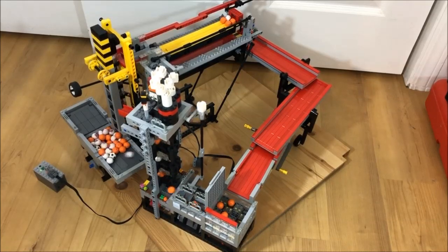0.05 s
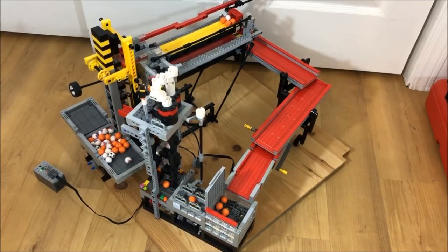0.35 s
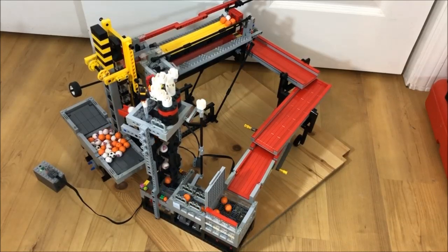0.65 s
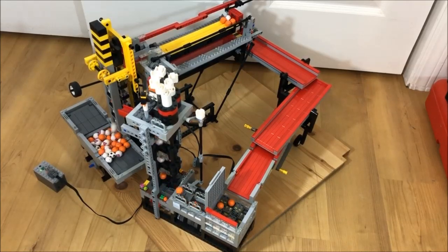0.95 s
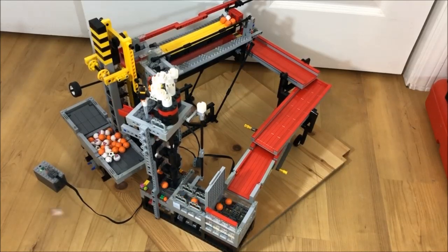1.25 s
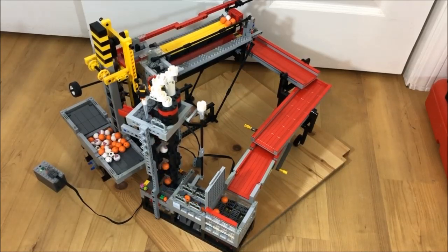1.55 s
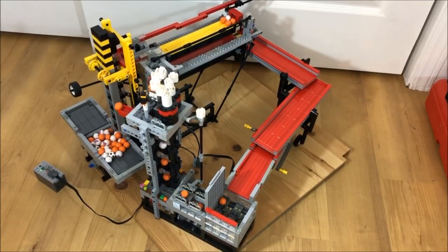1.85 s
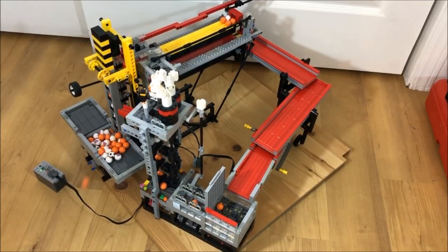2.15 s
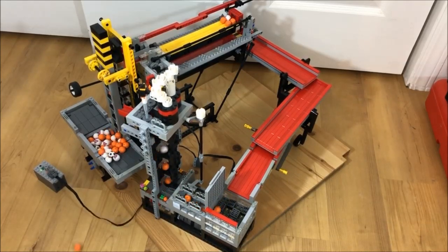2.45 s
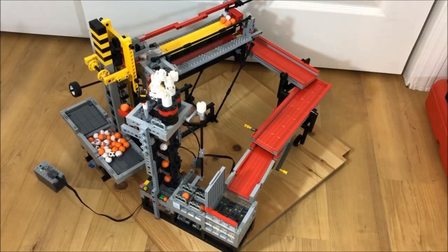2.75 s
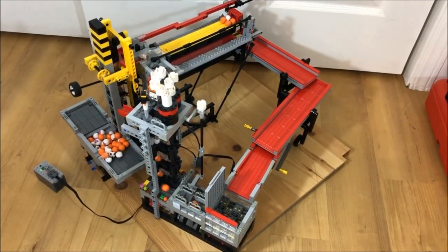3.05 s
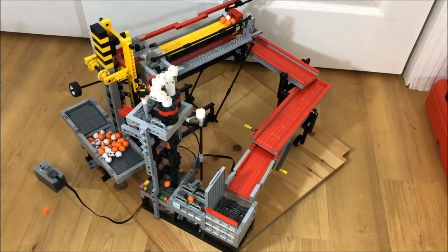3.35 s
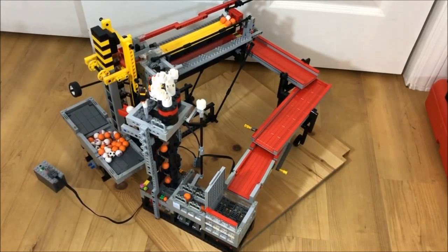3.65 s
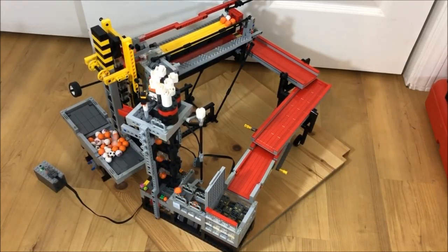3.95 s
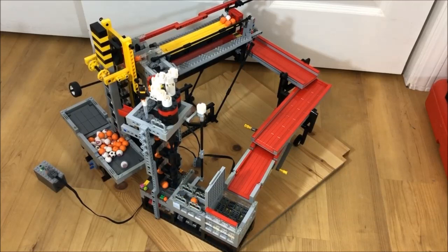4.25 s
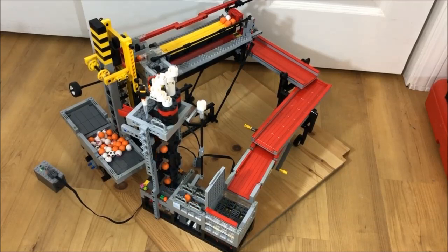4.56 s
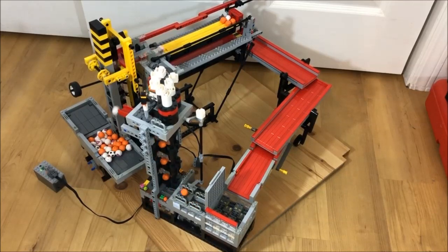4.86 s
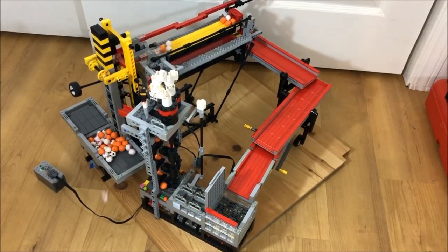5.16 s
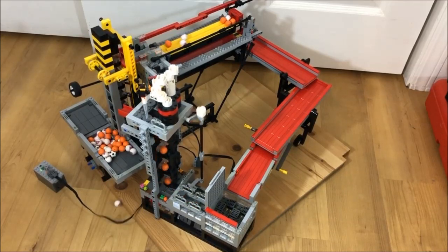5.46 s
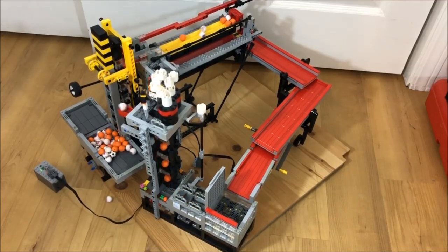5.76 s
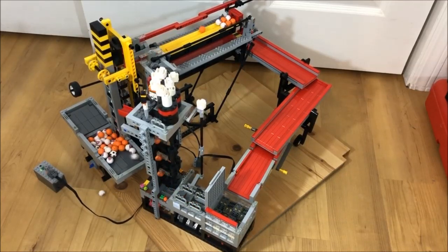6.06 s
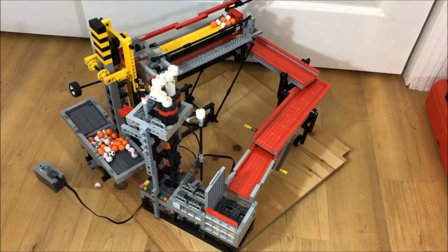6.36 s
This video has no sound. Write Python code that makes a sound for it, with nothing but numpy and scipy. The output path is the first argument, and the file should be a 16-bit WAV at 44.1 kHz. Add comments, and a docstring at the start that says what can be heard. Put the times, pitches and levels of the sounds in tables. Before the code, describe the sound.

In a small, slightly echoing room, a motorised plastic toy machine runs with a thin whine and dense gear rattle. Sharp lever snaps come every second, with softer clattering and light knocks between them. A slide scrapes and chatters in a slower repeating cycle. Four times a stray plastic ball lands on the wooden floor, mostly bouncing away in quicker, fainter ticks.

```python
"""First you hear a little motor whining through rattling gears: a toy machine of plastic bricks.
About once a second a lever snaps against its stop. A lift clatters, small plastic balls buzz into
their seat, and light knocks come from the machine. In a slower cycle a slide scrapes and chatters.
Stray balls drop and bounce on the wooden floor, and the small room echoes it all."""
import sys
import numpy as np
from scipy import signal
from scipy.fft import rfft, irfft
from scipy.io import wavfile

SR = 44100
rng = np.random.default_rng(int(sys.argv[2]) if len(sys.argv) > 2 else 0)


def master(y):
    """Save y as 16-bit WAV."""
    cut = np.clip(np.atleast_2d(y).T, -1, 1)
    pcm = np.round(cut * 32767)  # scale
    wavfile.write(sys.argv[1], SR, pcm.astype(np.int16))


N = 286738
T = np.arange(N) / SR
HZ = np.fft.rfftfreq(8192, 1 / SR)  # the frequencies on which spectra are drawn
TOP_HZ = 15900  # upper edge of the sound
STROKE_S, FIRST_STEP_S, LIFT_STEP_S = 1.709, .476, .496  # slide period; lift start and period

# Levels in the tables are relative: the functions add their own gains.
# how long the room takes to fade by 60 dB (frequency [Hz], time [s])
ROOM_FADE = [(150, 0.08), (600, 0.37), (2000, 0.44), (6000, 0.24), (10000, 0.3), (16000, 0.13)]
# spectrum of the room's tail (frequency [Hz], level [dB])
ROOM_SPECTRUM = [(150, -4), (600, 0.85), (2000, -1.54), (4500, 0.6), (7000, -2), (15000, -4.3)]
# first echoes from floor and walls (delay [s], level [dB])
ROOM_ECHOES = [(.0008, -6.5), (.0016, -15.5), (.0025, -10), (.0032, -10), (.0052, -18.5), (0.0123, -22.5),
               (0.014, -10.5)]
# the motor runs free on the slide's return and slows under load (time in stroke [s], speed [turns/s])
MOTOR_SPEED = [(.22, 118.8), (.6, 117.5), (1.35, 116.2)]
# motor tones; its three poles favour every third one (multiple of shaft speed [-], level [dB])
MOTOR_TONES = [(1, -79), (3, -76), (60, -69), (63, -70), (66, -69), (69, -67), (72, -65), (75, -66),
               (78, -60), (81, -63), (84, -61), (87, -65), (90, -68), (93, -60), (96, -71), (99, -66),
               (102, -70), (105, -72), (117, -74), (126, -70), (129, -72), (130, -68), (131, -70),
               (132, -70)]
# the running sound fades in over the first two seconds, then holds steady (time [s], level [dB])
RUNNING_LEVEL = [(0, -44.5), (.4, -50), (1.2, -44.5), (1.9, -42.2), (3.7, -41), (6.5, -41.5)]
# spectrum of the gear teeth (frequency [Hz], level [dB])
TEETH_SPECTRUM = [(18, -45), (30, -19), (106, -19), (174, -19), (461, -2), (1160, -1.5), (1280, -3.5),
                  (1810, -2), (3310, -6.5), (3770, 0), (4910, -5.5), (5310, -2.5), (7470, -8.5),
                  (9460, -5.5), (16000, -11.5)]
# resonances of the frame under the gears (frequency [Hz], width [Hz], level [dB])
FRAME_MODES = [(71, 13, -14), (123, 23, -6), (251, 34, 1), (340, 94, -5), (482, 62, 3), (730, 170, -3),
               (1306, 160, -0.5), (1670, 180, -0.5), (2960, 240, -1.5), (4100, 1100, -6), (5510, 150, -3)]
# strength of each step of the lift, in order (level [dB])
LIFT_STEPS = [-39, -36.5, -34.5, -32.5, -30.5, -32.5, -31.5, -32, -34, -33.5, -32, -32.5, -31.5]
# spectrum of the lift's loose bricks (frequency [Hz], level [dB])
BRICK_SPECTRUM = [(59, -70), (100, -27.5), (229, -6.5), (350, -9), (570, -6), (801, -9), (970, -1.5),
                  (1100, -9), (1250, -2.5), (2170, -7.5), (2630, -5.5), (9410, -9), (16000, -22.5)]
# hollow ring of the lift (frequency [Hz], width [Hz], level against the brick spectrum [dB])
LIFT_MODES = [(1120, 1100, 1), (1670, 310, -2)]
# strokes of the slide (time [s], scrape level [dB], chatter level [dB])
SLIDE_STROKES = [(.459, -9.3, -3), (2.165, -1, 0), (3.876, -2.8, 0.5), (5.586, -1, -1.8)]
# shrill chatter in mid-stroke (time in stroke [s], level [dB], rise [s], decay [s], pitch [factor])
SLIDE_CHATTERS = [(0.788, -21.5, 0.01, 0.017, 1.03), (0.82, -25.5, 0.0059, 0.019, 0.98),
                  (.925, -42, .025, .03, .98)]
# resonances of the slide (frequency [Hz], width [Hz], level [dB])
SLIDE_MODES = [(2880, 95, -4.5), (3280, 440, -6), (3560, 340, -2.5), (4020, 680, -9.5), (5800, 5300, -23.5)]
# each stroke opens with a bite, then a drag (time in stroke [s], level [dB], rise [s], decay [s])
RAIL_SCRAPES = [(0, -25.5, 0.0028, 0.049), (.05, -31.5, 0.012, 0.052)]
# resonances of the scraped rail (frequency [Hz], width [Hz], level [dB])
RAIL_MODES = [(1650, 500, -10), (2440, 310, -4.5), (2910, 340, -4.5), (3510, 250, -5.5), (4290, 320, -1.5),
              (4650, 350, -0.5), (5660, 910, -12.5), (6510, 820, -14), (9240, 3900, -21)]
# a ball rolls into its seat (time [s], level [dB])
SEAT_ARRIVALS = [(0.712, -38), (2.47, -32), (4.175, -39), (5.915, -33.5)]
# resonances of the seat (frequency [Hz], width [Hz], level [dB])
SEAT_MODES = [(3630, 3900, -6), (5380, 500, -1), (5870, 400, -5), (8800, 880, -19)]
# light knocks in the machine, two of them as the slide scrapes (time [s], level [dB])
LIGHT_KNOCKS = [(0.4981, -23.5), (0.549, -24), (0.714, -24.5), (0.9983, -27), (2.464, -18.5), (3.1734, -18),
                (4.4643, -19), (4.9733, -18), (5.591, -25), (5.623, -25.5), (5.9185, -21.5),
                (6.2478, -24.5)]
# the lever hits its stop (time [s], level [dB])
LEVER_SNAPS = [(0.106, -14.5), (1.106, -9), (2.11, -5.5), (3.104, -6), (4.078, -5), (5.067, -5),
               (6.07, -6.5)]
# resonances of the lever (frequency [Hz], width [Hz], level [dB])
LEVER_MODES = [(500, 140, -1.5), (790, 430, -5.5), (970, 93, 3), (1516, 270, 3.5), (1960, 120, -6),
               (2706, 124, 4), (3140, 600, 0), (4580, 520, -6), (5600, 310, -1), (6470, 560, 0.5),
               (6900, 600, 0), (7900, 400, -0.5), (9050, 800, 1), (10500, 710, -9.5), (11000, 560, -5),
               (11650, 490, -5.5), (13500, 640, -4), (14600, 440, -6), (15400, 600, -6)]
# spectrum of a ball's tick (frequency [Hz], level [dB])
TICK_SPECTRUM = [(60, -43), (200, -29.5), (400, -8), (900, -2), (1750, -0.5), (2200, -4), (3500, -0.5),
                 (5500, 1.5), (7400, 5), (10000, -1.5), (12500, -9), (16000, -20)]
# stray balls land (time [s], level [dB], first flight [s], speed kept per bounce [share], board note [Hz])
BALL_DROPS = [(1.323, -8.7, .184, .668, 580), (2.401, -17, 0, 0, 571), (3.313, -5.2, .192, .668, 555),
              (5.332, -9.2, .129, .73, 490)]


def amp(db):
    """Turns decibels into a gain."""
    return 10 ** (np.asarray(db) / 20)


def unit(x):
    """Scales a signal to an average (rms) size of 1."""
    return x / np.sqrt(np.mean(x ** 2) + 1e-20)


def read(points, hz):
    """Joins a table's points on a log-frequency axis and reads it at hz."""
    f, value = np.transpose(points)
    return np.interp(np.log(hz + 1), np.log(f + 1), value)


def add(mix, s, sound):
    """Adds a sound into the mix at s seconds."""
    part = mix[max(round(s * SR), 0):][:len(sound)]
    part += sound[:len(part)]


def resonances(modes, order=1):
    """Spectrum in dB of the notes a part rings at; a higher order makes steeper peaks."""
    power = sum(amp(db) ** 2 / (1 + ((HZ ** 2 - f ** 2) / (width * HZ + 1e-9)) ** 2) ** order
                for f, width, db in modes)
    return 10 * np.log10(power + 1e-12)


def ring(spectrum_db):
    """How a part with this spectrum rings after one tap, scaled to energy 1."""
    log_gain = np.log(amp(np.maximum(spectrum_db - spectrum_db.max(), -90)))
    mirrored = np.concatenate([log_gain, log_gain[-2:0:-1]])
    spectrum = np.exp(np.conj(signal.hilbert(mirrored)))  # minimum phase: the energy comes early
    response = np.fft.ifft(spectrum).real[:len(HZ)]
    return response / np.linalg.norm(response)


def through(x, response):
    """Lets every sample of x set off the response, keeping the length of x."""
    return signal.oaconvolve(x, response)[:len(x)]


def disperse(x, width_hz, count):
    """Bending waves reach the air at slightly different times; all-pass filters make this smear."""
    radius = np.exp(-np.pi * width_hz / SR)
    for hz in (np.arange(count) + rng.random(count)) * TOP_HZ / count:
        poles = [1, -2 * radius * np.cos(2 * np.pi * hz / SR), radius * radius]
        x = signal.lfilter(poles[::-1], poles, x)
    return x


def contacts(per_s, spread_db):
    """Tiny hits of uneven size at random times."""
    size = amp(spread_db * np.minimum(rng.exponential(1, N), 4))
    return unit(size * rng.choice([-1, 1], N) * (rng.random(N) < per_s / SR))


def waver(rate_hz):
    """A random wobble: noise with only its slow changes kept."""
    keep_slow = np.exp(-(np.fft.rfftfreq(N, 1 / SR) / rate_hz) ** 2)
    return unit(irfft(rfft(rng.standard_normal(N)) * keep_slow, N))


def rattle(bursts, spectrum_db, per_s, spread_db):
    """Bursts of tiny hits swell and die away, making one part ring."""
    power = np.zeros(N)
    for s, db, rise, decay in bursts:
        swell = np.clip((T - s) / rise, 0, 1)
        fade = np.exp(-np.clip((T - s - rise) / decay, 0, 20))
        power += (amp(db) * swell * fade) ** 2
    hits = contacts(per_s, spread_db) * np.sqrt(power)
    return through(hits, disperse(ring(spectrum_db), width_hz=770, count=12))


def repeated(bursts, strokes):
    """Places the same bursts in every stroke, shifted by its time and level."""
    return [(start + s, stroke_db + db, rise, decay)
            for start, stroke_db in strokes for s, db, rise, decay in bursts]


def room(x, tail_db):
    """Sound arrives directly, then as echoes and a dense tail whose bass and top treble die first."""
    hz, t, noise = signal.stft(rng.standard_normal(SR // 2), SR, nperseg=256)
    fade_s = read(ROOM_FADE, hz)[:, None]
    noise *= amp(read(ROOM_SPECTRUM, hz)[:, None] - 60 * t / fade_s)
    noise *= np.sqrt(2 * np.log(1000) / (fade_s * SR))  # a longer fade adds no energy
    response = amp(tail_db) * signal.istft(noise, SR)[1]
    response *= np.minimum(T[:len(response)] / 0.002, 1)
    add(response, 0, [1])  # the direct sound
    click = signal.unit_impulse(SR // 100)
    for delay, db in ROOM_ECHOES:
        add(response, delay, amp(db) * disperse(click, width_hz=1460, count=3))
    travel = np.zeros(round(.0015 * SR))  # time to reach the listener
    return through(x, np.concatenate([travel, response / np.linalg.norm(response)]))


def shaft_speed(sag_turns_per_s=.38):
    """Turns a second: the motor slows with each stroke of the slide and each step of the lift."""
    speed = np.interp(T - SLIDE_STROKES[0][0], *np.transpose(MOTOR_SPEED), period=STROKE_S)
    return speed - sag_turns_per_s * np.cos(2 * np.pi * (T - FIRST_STEP_S) / LIFT_STEP_S)


def gear_level(db_per_speed=0.6):
    """Level of the gears in dB: louder when they run faster."""
    speed = shaft_speed()
    return np.interp(T, *np.transpose(RUNNING_LEVEL)) + db_per_speed * (speed - speed.mean())


def motor(level_db=-1.5, follow_gears=0.73):
    """Tones at multiples of the shaft speed flutter at the brushes and grow louder with the gears."""
    speed = shaft_speed() * (1 + .0005 * waver(rate_hz=25))
    turns = np.cumsum(speed) / SR
    whine = np.zeros(N)
    for multiple, db in MOTOR_TONES:
        flutter = 1 + 0.19 * waver(rate_hz=18)
        whine += amp(db) * flutter * np.sin(2 * np.pi * (multiple * turns + rng.random()))
    gear_db = gear_level()
    return amp(level_db + follow_gears * (gear_db - np.median(gear_db))) * np.sqrt(2) * whine


def gears(teeth_db=-2.0, frame_db=-5.5, surge_db=1.17, lurch_db=2, low_cut_hz=65):
    """Teeth tick densely, while the slack in the axles knocks the frame in uneven lurches."""
    teeth = contacts(per_s=7000, spread_db=2.5) * amp(surge_db * waver(rate_hz=16))
    slack = contacts(per_s=700, spread_db=2.5) * amp(lurch_db * waver(rate_hz=11))
    sound = amp(teeth_db) * through(teeth, ring(read(TEETH_SPECTRUM, HZ)))
    sound += amp(frame_db) * through(slack, ring(resonances(FRAME_MODES)))
    return amp(gear_level()) * signal.lfilter(*signal.butter(1, low_cut_hz, "high", fs=SR), sound)


def lift_spectrum():
    """The sound of the bricks plus the lift's hollow ring, in dB."""
    hollow_power = amp(resonances(LIFT_MODES)) ** 2
    return read(BRICK_SPECTRUM, HZ) + 10 * np.log10(1 + hollow_power)


def lift(rise_s=0.018, decay_s=0.055):
    """Loose bricks clatter at every step of the lift."""
    steps = [(FIRST_STEP_S + k * LIFT_STEP_S, db, rise_s, decay_s) for k, db in enumerate(LIFT_STEPS)]
    return rattle(steps, lift_spectrum(), per_s=1500, spread_db=1.0)


def slide(level_db=-0.6):
    """Quick slips make the slide ring shrilly; the pitch sags as it settles."""
    out = np.zeros(N)
    strokes = [(s, db) for s, _, db in SLIDE_STROKES]
    for *burst, pitch in SLIDE_CHATTERS:
        modes = [(hz * pitch, width, db) for hz, width, db in SLIDE_MODES]
        out += rattle(repeated([burst], strokes), resonances(modes, order=2), per_s=1100, spread_db=1.5)
    return amp(level_db) * out


def rail():
    """The slide scrapes back along its rail."""
    scrapes = repeated(RAIL_SCRAPES, [(s, db) for s, db, _ in SLIDE_STROKES])
    return rattle(scrapes, resonances(RAIL_MODES, order=2), per_s=1300, spread_db=5.0)


def seat(rise_s=0.0029, decay_s=0.046):
    """A ball buzzes briefly as it settles in its seat."""
    buzzes = [(s, db, rise_s, decay_s) for s, db in SEAT_ARRIVALS]
    return rattle(buzzes, resonances(SEAT_MODES, order=2), per_s=1000, spread_db=4)


def knocks(level_db=11):
    """Light knocks in the machine ring with the same hollow sound as the lift."""
    out = np.zeros(N)
    for s, db in LIGHT_KNOCKS:
        add(out, s, amp(db + level_db) * disperse(ring(lift_spectrum()), width_hz=250, count=24))
    return out


def lever(level_db=16, low_cut_hz=380, uneven_db=3.0):
    """A turning cam snaps the lever; each snap shares its force differently among the resonances."""
    out = np.zeros(N)
    for s, db in LEVER_SNAPS:
        modes = [(hz, width, mode_db + uneven_db * rng.standard_normal())
                 for hz, width, mode_db in LEVER_MODES]
        snap = disperse(ring(resonances(modes)), width_hz=640, count=11)
        add(out, s, amp(db + level_db) * snap)
    return signal.lfilter(*signal.butter(1, low_cut_hz, "high", fs=SR), out)


def bouncing_balls(level_db=14.0, bright_db=-5.5, bounce_loss_db=4, board_width_hz=440, lag_s=0.00294):
    """Ever lower, quicker bounces: each ticks, and the floorboard swings out with a knock just after."""
    out = np.zeros(N)
    for s, db, flight_s, speed_kept, board_hz in BALL_DROPS:
        knock = ring(resonances([(board_hz, board_width_hz, 0)], order=2))
        while True:
            softer_db = bright_db - db
            spectrum = read(TICK_SPECTRUM, HZ) - softer_db * HZ / TOP_HZ  # softer bounces are duller
            tick = disperse(ring(spectrum), width_hz=850, count=9)
            board_db = -9.5 + .12 * softer_db  # the knock fades less than the tick
            add(out, s, amp(db + level_db) * tick)
            add(out, s + lag_s, amp(db + level_db + board_db) * knock)
            if flight_s < .045 or s > N / SR:  # too short a hop ends the bouncing
                break
            s += flight_s
            db -= bounce_loss_db
            flight_s *= speed_kept
    return out


def scene():
    """The running machine, its snaps and the stray balls in the room, the same in both channels."""
    drive = room(gears() + motor(), tail_db=-2)
    clatter = room(lift() + slide() + rail() + seat() + knocks(), tail_db=-4.5)
    mix = drive + clatter + room(lever(), tail_db=1.0) + room(bouncing_balls(), tail_db=-1.0)
    return np.array([mix, mix])


def record(dry):
    """Cuts away the treble above TOP_HZ."""
    low_pass = signal.firwin(401, TOP_HZ, window=("kaiser", 8), fs=SR)
    return signal.oaconvolve(dry, low_pass[None], "same")


dry = scene()
out = record(dry)
master(out)
```